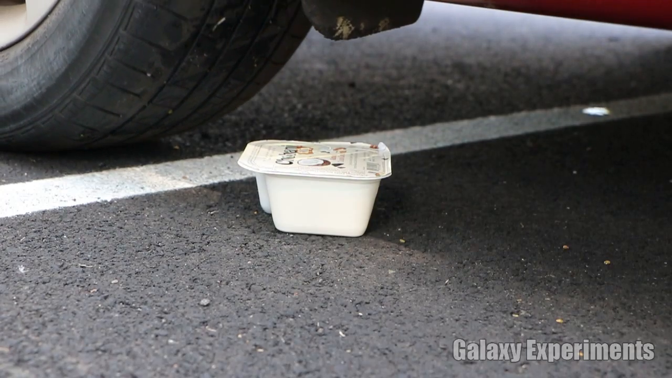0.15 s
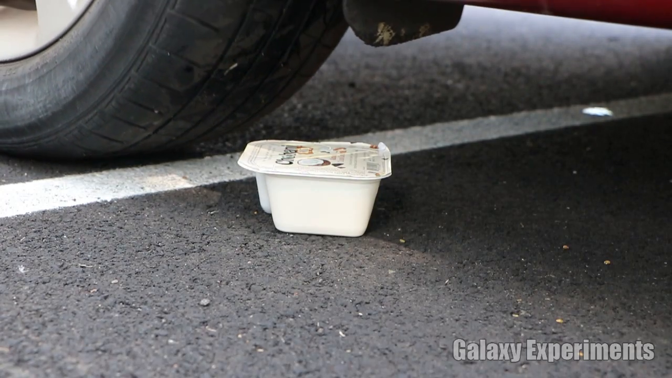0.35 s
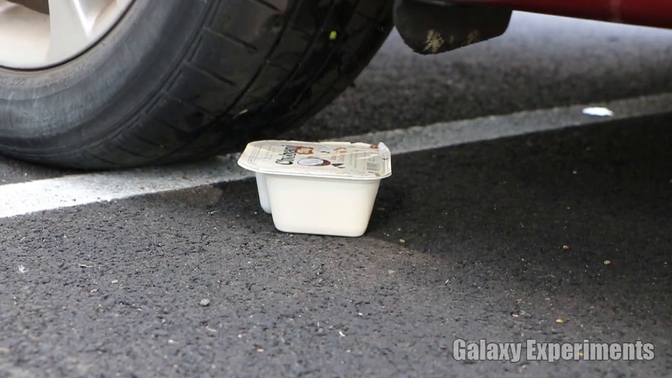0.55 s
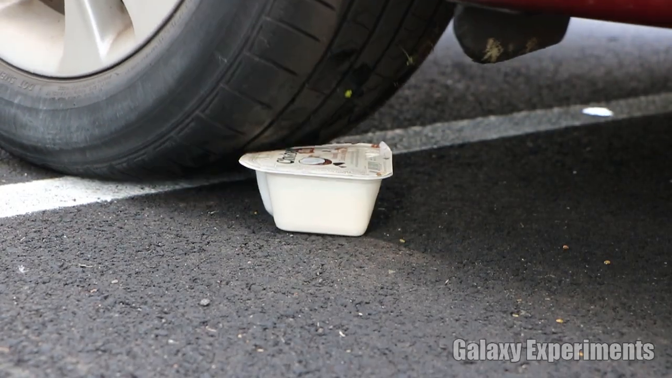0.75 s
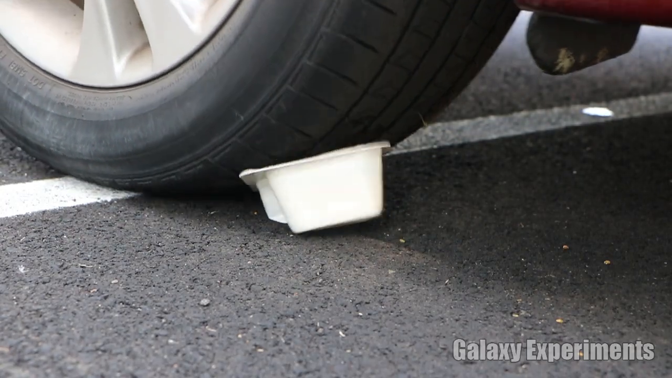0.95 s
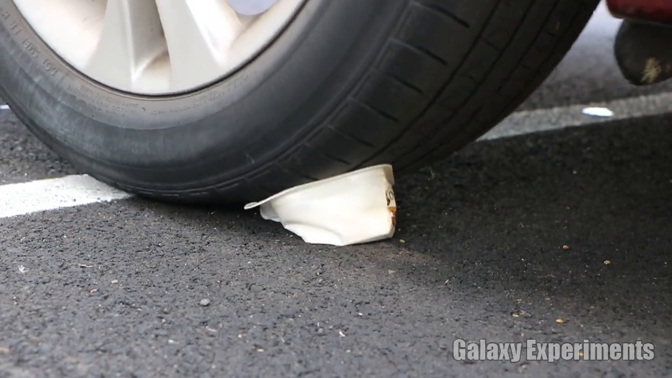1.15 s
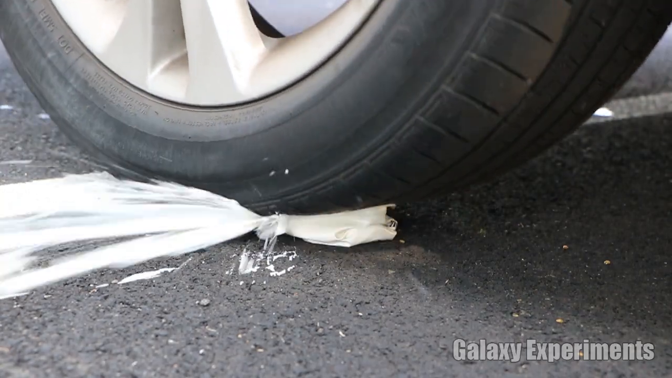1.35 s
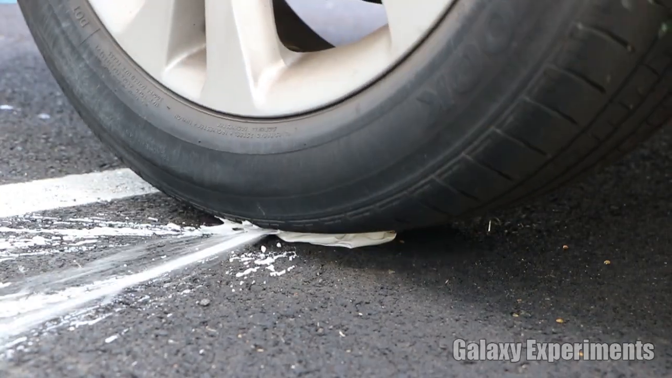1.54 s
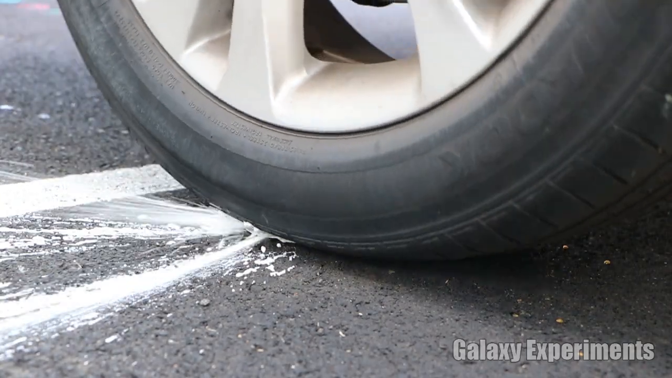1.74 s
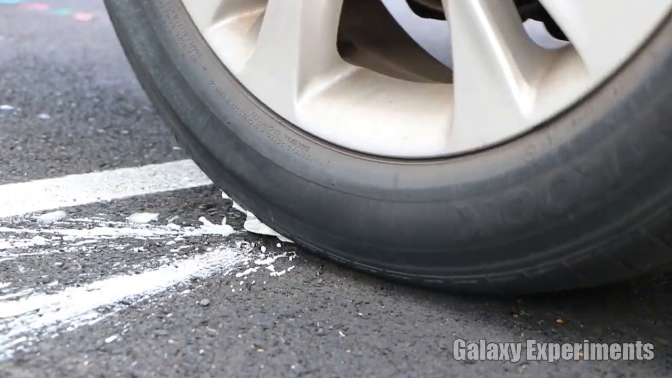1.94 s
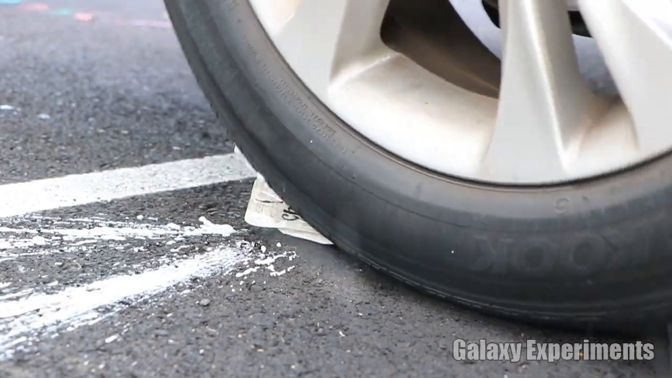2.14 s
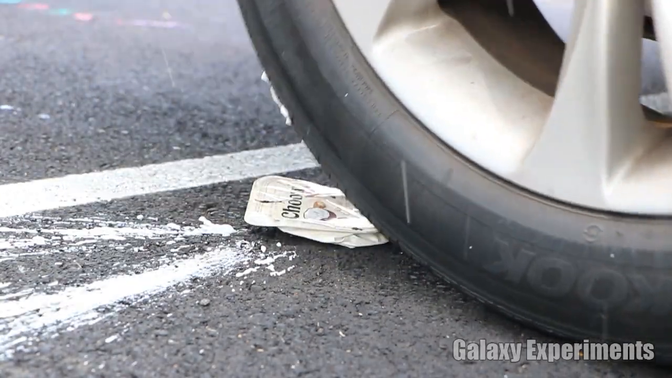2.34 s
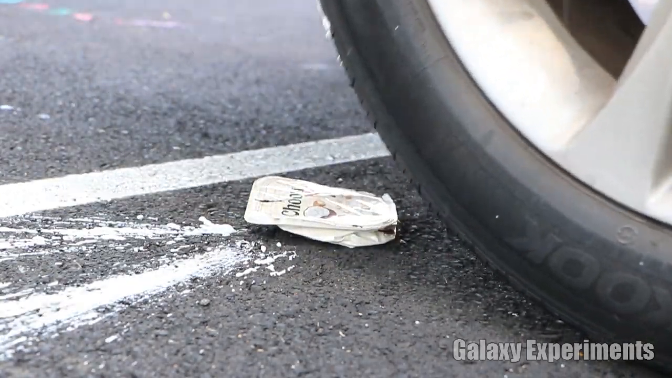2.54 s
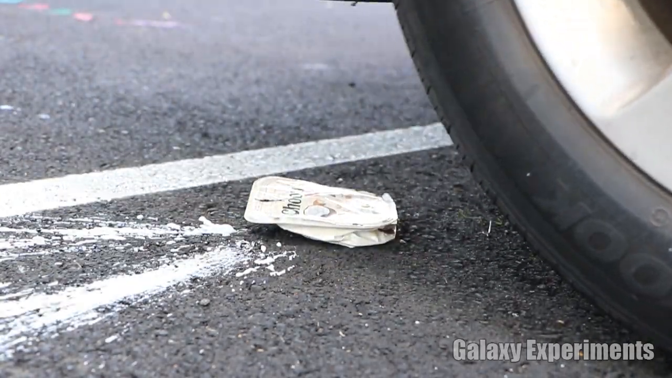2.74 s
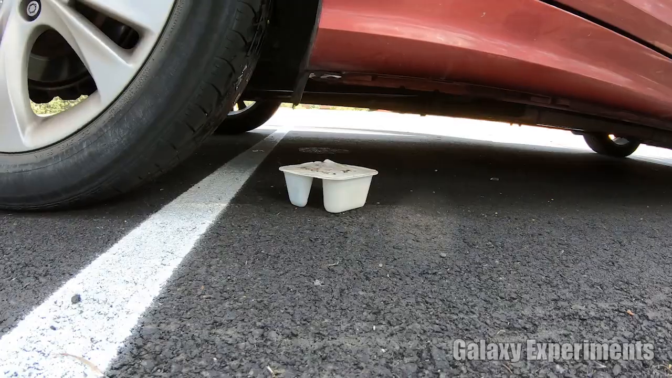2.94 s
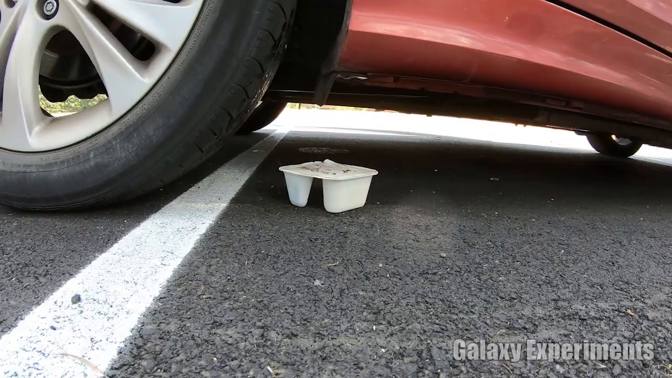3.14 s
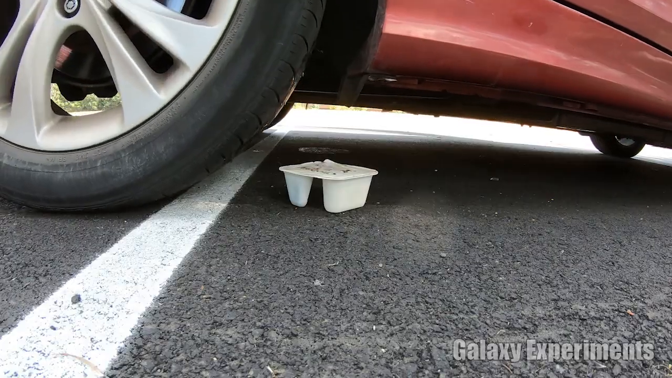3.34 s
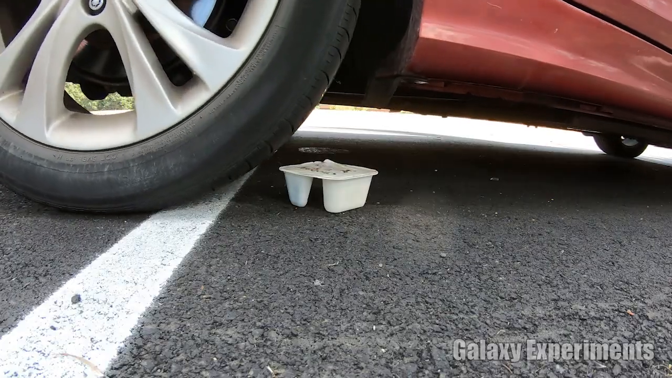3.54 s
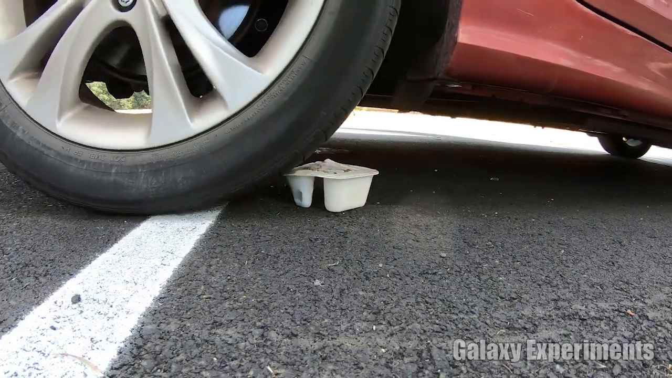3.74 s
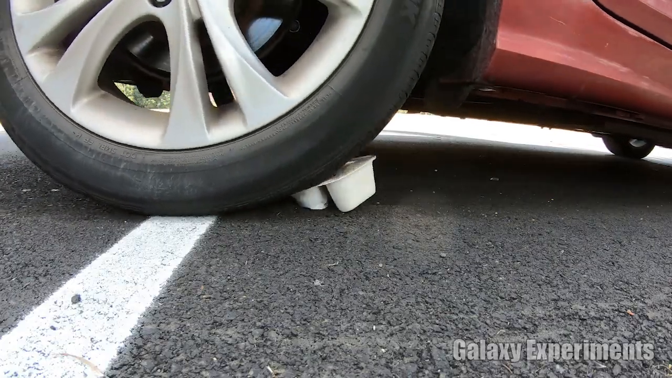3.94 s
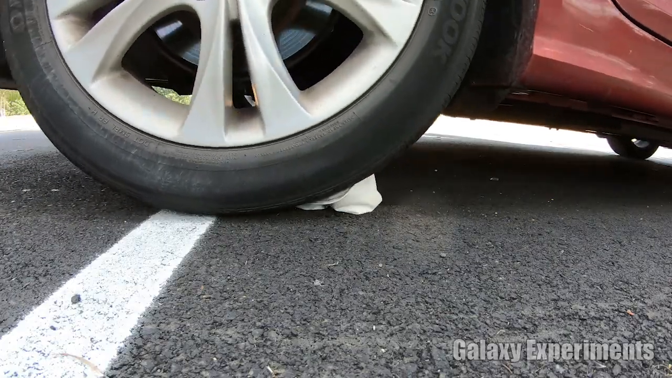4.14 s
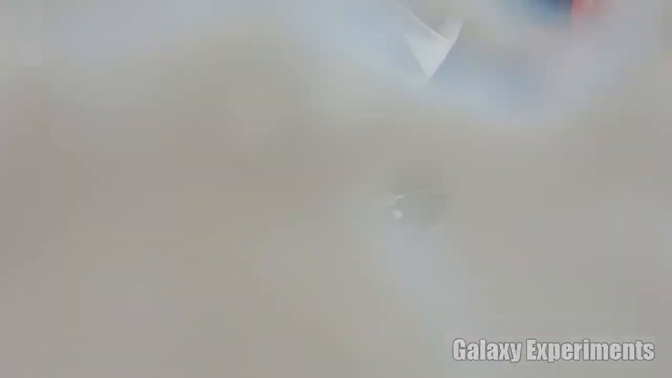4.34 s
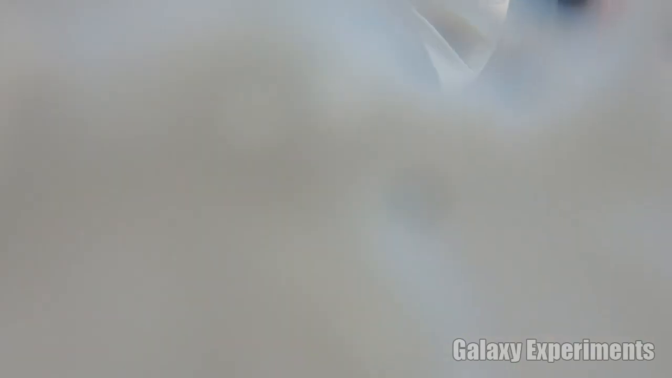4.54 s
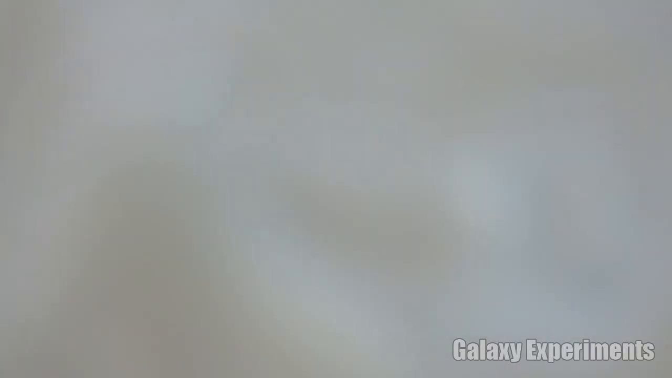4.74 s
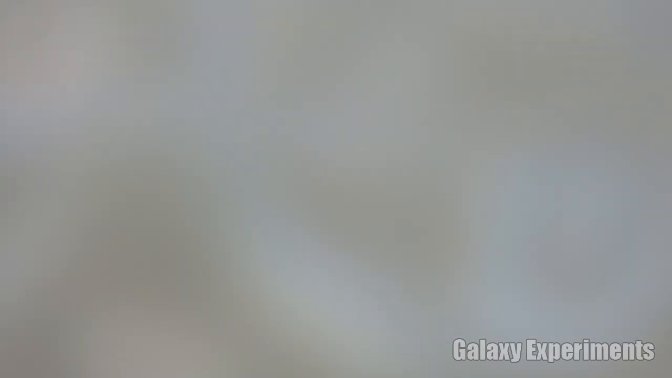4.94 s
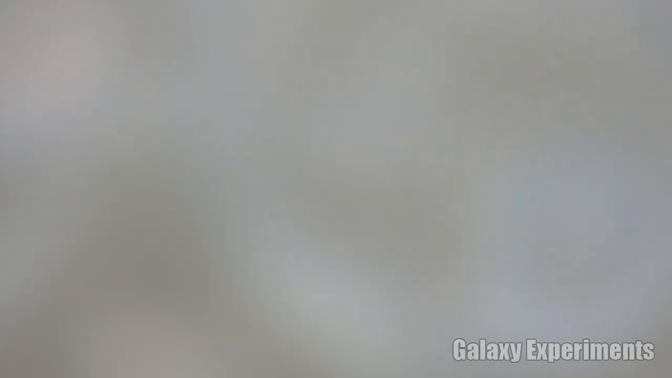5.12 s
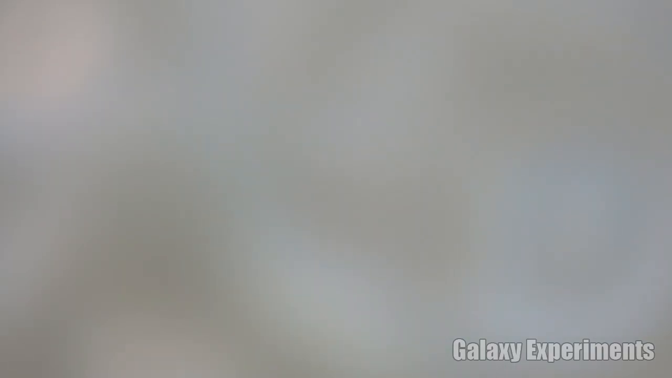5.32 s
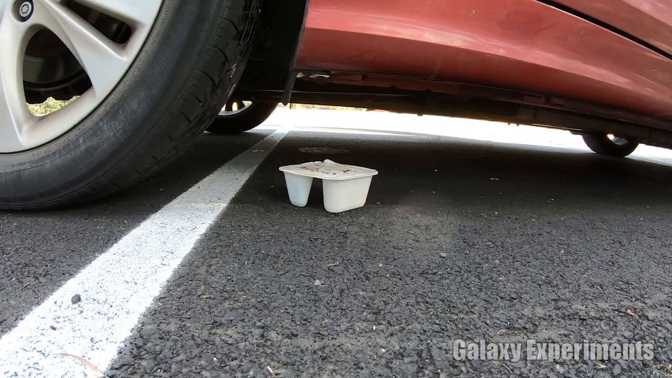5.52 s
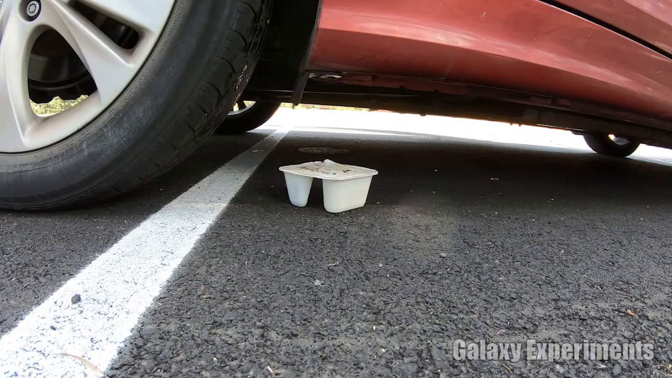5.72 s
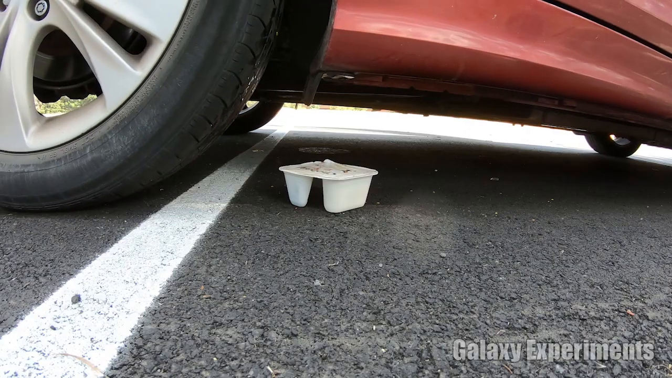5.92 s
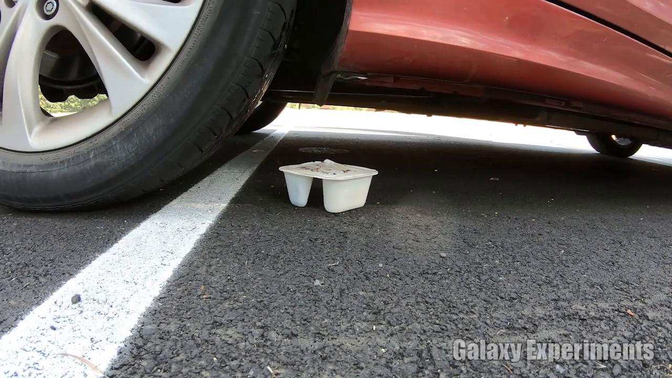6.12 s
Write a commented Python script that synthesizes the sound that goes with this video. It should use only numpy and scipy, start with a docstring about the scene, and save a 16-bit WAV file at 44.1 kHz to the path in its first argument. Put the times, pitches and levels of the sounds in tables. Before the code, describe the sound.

A plastic tub is crushed twice under a slow car tyre on asphalt. The first crush, close and in mono, builds from crackling to overloading cracks and a sizzling squirt, followed by a short rasp and small hollow pops. After a lull with a faint idling car, the second is heard low down in stereo: duller crackle, deep thuds and a loud burst that splashes the microphone, fading to a quiet low rumble.

```python
"""Tyre crushing a plastic tub.

A car rolls over a sealed tub on asphalt: the walls crackle, groan and crack, the filling squirts out.
The crush plays twice: in mono, then at a low stereo microphone that is splashed. Car park air ends it.
The volume is turned up for each crush, and the loudest cracks overload."""
import sys
import numpy as np
from scipy import signal
from scipy.fft import rfft, irfft
from scipy.io import wavfile
from scipy.ndimage import uniform_filter1d

SR = 44100
rng = np.random.default_rng(int(sys.argv[2]) if len(sys.argv) > 2 else 0)


def master(y):
    """Save y as 16-bit WAV."""
    cut = np.clip(np.atleast_2d(y).T, -1, 1)
    pcm = np.round(cut * 32767)  # scale
    wavfile.write(sys.argv[1], SR, pcm.astype(np.int16))


N = 276830
TIME_S = np.arange(N) / SR
MONO, LOW, TAIL = range(3)  # sections: mono crush, crush at the low microphone, air alone
BOUNDS_S, CRUSH_DELAY_S = (0, 2.908, 5.58, 6.3), (0, 3.0387, 5.8)


# First touch to roll-off: (crush time [s], crackle [dB], groan [dB], fizz [dB], crackle centre [Hz])
CRUSH = [(.792, -37, -42.5, -47, 1760), (.87, -24.5, -33.5, -47, 1900), (1.0, -27.5, -31.5, -43.5, 2100),
         (1.1, -35, -21, -45.5, 1450), (1.2, -35, -33.5, -41, 1540), (1.31, -43, -38, -37, 1650),
         (1.345, -49.5, -42.5, -65, 1500), (1.44, -38, -39.5, -35, 2000), (1.54, -43, -57.5, -46.5, 2300),
         (1.63, -35.5, -48, -33, 2650), (1.79, -43.5, -54.5, -34.5, 2800), (1.88, -32, -44, -25.5, 2680),
         (1.96, -42.5, -41, -40.5, 1900), (2.07, -38.5, -43, -48, 1690), (2.12, -32, -33.5, -39, 2800),
         (2.27, -34, -43, -40, 3000), (2.33, -51, -48, -61, 1600), (2.905, -48, -45.5, -64, 1500)]
# Tyre shielding the low microphone: (crush time [s], crackle gain [dB], groan gain [dB], fizz gain [dB])
SHADOW = [(.79, -16, -10.5, -9.5), (1.15, -10, -16, -11), (1.3, -23.5, -22.5, -18), (1.7, -18, -9, -9.5),
          (2.0, -13.5, -21, -8), (2.3, -10, -10, -13), (2.55, -12, -15, 5)]


def crushing():
    """Small folds crackle, large panels groan, the torn lid and the squirt fizz."""
    t = crush_time()
    gains = [amp(curve(CRUSH, k, t) + section(LOW) * curve(SHADOW, k, t)) for k in (1, 2, 3)]
    crackle = grains(800, 5200, cycles=2.8, per_s=3500, spread_db=3.8, centre_hz=curve(CRUSH, 4, t))
    groan = grains(330, 1000, cycles=2.6, per_s=600, spread_db=1.7)
    fizz = grains(3300, 14500, cycles=2.4, per_s=5000, spread_db=3.5)
    return (crackle * gains[0] + groan * gains[1] + fizz * gains[2]) * (t >= CRUSH[0][0])


def crack(ring_db, hz, boom_db, splinter_db, length_ms, noise):
    """A click and a burst of slips: the panel rings, the tub booms, splinters hiss. Also used for spatters."""
    t = np.arange(2500) / SR
    decay_ms = np.clip(.6 * length_ms, .1, 3)
    burst = (1 - np.exp(-t / .00058)) * np.exp(-(t * 1000 / decay_ms) ** .78)
    size = np.linalg.norm(burst)  # scales click and after-rattle
    click = size * signal.unit_impulse(len(t), round(.0005 * SR))
    slips = click + noise[0] * (burst + .018 * size * decay(t, .073))
    ring = band(slips, hz * .84, hz * 1.19) + .55 * band(band(slips, hz * .5, hz * 2.1), hz * .3, hz * 5.4)
    shove = 1.5 * click + noise[1] * (burst + .025 * size * decay(t, .07))
    boom = band(band(shove, 400, 800), 160, 1500)
    splinters = band(.57 * click + noise[2] * (burst ** 1.6 + .008 * size * decay(t, .03)), 6500, 22000)
    parts = (ring_db, ring), (boom_db, boom), (splinter_db, splinters)
    return sum(amp(db) * x / abs(x).max() for db, x in parts)


def snaps(count=70):
    """Random small cracks, as rows of CRACKS_AND_SPATTERS; level and pitch follow the crackle."""
    when, size, pitch, length = rng.random((count, 4)).T
    s = CRUSH[0][0] + when * (CRUSH[-2][0] - CRUSH[0][0])
    db = curve(CRUSH, 1, s) + 5.5 - 4 * np.log(size + .01)
    hz = curve(CRUSH, 4, s) * 2 ** (1.6 * pitch - .4)
    return np.transpose([s, db, hz, db - 8.5, db - 13, 2.4 * (length + .2), curve(SHADOW, 1, s)])


# Wall cracks, plus a few spatters of filling striking the low microphone: (crush time [s], ring [dB],
# ring pitch [Hz], boom [dB], splinters [dB], nominal length [ms], gain at the low microphone [dB])
CRACKS_AND_SPATTERS = [(.8343, 4, 1335, -19.5, -11.5, 6.4, -12.5), (.8484, -7.5, 1530, -13.5, -33, 4.3, -8),
                       (.8674, -10.5, 1470, -14.5, -36.5, 3.7, -9), (.914, -20, 3200, -18, -34, 2.6, -18),
                       (.9237, -7.5, 2470, -15.5, -37, 1.2, -25), (.9513, -8, 3900, -13, -34, 1.3, -16),
                       (.9717, -20, 4200, -33.5, -34.5, 2.1, -22),
                       (.9867, -12.5, 2580, -24, -30.5, 1.1, -9), (.9934, -8, 2460, -32, -33.5, .87, -31),
                       (1.0229, 1.5, 2500, -5, -20, 1, -10), (1.0912, -14, 900, -13.5, -37, 3.7, -22),
                       (1.1374, -4.5, 1790, -27, -16, .47, -16), (1.1439, -6, 1200, -7.5, -20, .96, -6.5),
                       (1.2106, -1.5, 1620, -5.5, -19, .96, -15.5),
                       (1.2145, -19, 905, -23.5, -34.5, 2.4, 0.5), (1.2637, -33.5, 770, -24, -53.5, 3.8, 8),
                       (1.2741, -29, 724, -16.5, -49.5, 1.7, 11.5), (1.2859, 7.5, 726, 6, 4.5, 1.26, -8),
                       (1.3395, -44.5, 1740, -61.5, -44, 4.6, 18.5), (1.3575, -10, 3230, -25, -11, 5, -19),
                       (1.3644, -60, 4450, -61, -26.5, 1.9, 16), (1.3894, -11.5, 1100, -32, -3, 5.3, -15),
                       (1.3994, -6.5, 4430, -23.5, -17, .34, -19.5),
                       (1.4416, -11, 1840, -38.5, -3, 2.7, -20.5),
                       (1.4545, -20.5, 3850, -23.5, -21, .3, -15), (1.4577, -35.5, 910, -42, -35, .7, 13.5),
                       (1.4674, 6, 3100, -5, 2, .9, -7), (1.4688, 6, 1100, 0, -13, 3, -28),
                       (1.5703, -14.5, 2550, -48, -33, .6, -22.5),
                       (1.6026, -15.5, 2580, -29, -28.5, .71, -28), (1.6213, -19, 3100, -43, -17, .41, -19),
                       (1.6404, -6, 2980, -37.5, -3, 1.4, -22), (1.6672, 8.5, 3600, -24, -5, 3, -15),
                       (1.7074, -5, 3600, -40, -15, 2, -5), (1.7126, -2.5, 2750, -39, -6, 1.3, -13),
                       (1.7415, -4, 4670, -36.5, 0, 1.8, -9), (1.7572, 2.5, 3870, -19, -2.5, 1.05, -11),
                       (1.774, -15.5, 3570, -36, -13, 1.7, -4), (1.7992, -4, 3280, -30, 5.5, 2.1, -8),
                       (1.8069, -1, 4570, -47, -10, .98, -20), (1.8256, -14, 3300, -34.5, -1.5, 1.2, -10),
                       (1.8303, -21, 2000, -41, -13.5, 3, 6), (1.8445, -5, 4100, -38, 0, 2, -8.5),
                       (1.8614, -11, 5340, -34, -3, 2, -21), (1.8767, -20, 2930, -30, -3, .35, -13),
                       (1.886, -25, 3670, -47, -4, 1.3, -4), (2.0855, -28, 1500, -21.5, -42, 2.5, -12),
                       (2.206, -15, 1320, -42, -53, 1, -22), (2.2877, -15.5, 1370, -30, -35, 1.7, -16)]


def cracks_and_spatters():
    """The walls crack and filling strikes the low microphone, which gets less boom and more treble."""
    out, rows = np.zeros(N), np.concatenate([CRACKS_AND_SPATTERS, snaps()])
    for s, ring_db, hz, boom_db, splinter_db, ms, low_db in rows:
        noise = rng.standard_normal((3, 2500))
        onset_s = s - .0004  # the burst swells before it peaks
        add(out, onset_s, crack(ring_db, hz, boom_db, splinter_db, ms, noise))
        low_hit = crack(ring_db, hz, boom_db - 1.5, splinter_db + 2.5, ms, noise[::-1])
        add(out, onset_s + CRUSH_DELAY_S[LOW], amp(low_db) * low_hit)
    return out


# Pressure pulses: (time [s], level [dB], rise [ms])
SPLATS = [(1.287, -20, 1.2), (1.469, -16.5, 0.68), (1.756, -32.5, 1.2), (4.327, -2.5, 0.5), (4.4, -18, 1.2),
          (4.507, -7, 2.36)]


def splats():
    """The sealed tub bursts and pushes air; the microphone leaks the pulse away and overshoots."""
    out, t = np.zeros((2, N)), np.arange(4000) / SR
    for s, db, rise_ms in SPLATS:
        age = t * 1000 / rise_ms
        push = band(-amp(db) * age * np.exp(1 - age), 37, 1980)
        add(out[0], s, (.7 if s > BOUNDS_S[LOW] else 1) * push)
        add(out[1], s, push)
    return out


# Thudding, one curve per crush: (time [s], level [dB])
THUDDING = [
    [(.792, -47), (1.11, -48), (1.18, -37), (1.3, -30.5), (1.37, -58), (1.43, -41), (1.55, -81), (2.1, -68),
     (2.32, -46), (2.34, -71), (2.905, -71)],
    [(3.846, -52), (3.91, -42.5), (4.1, -38), (4.23, -38), (4.41, -28), (4.54, -49), (4.72, -50),
     (5.04, -53.5), (5.57, -58)],
]


def thudding():
    """Lumpy push of air and filling; deeper and partly unrelated at the low microphone's two ports."""
    mono = unit_rms(band(band(rng.standard_normal(N), 85, 230), 89, 390))
    common, left, right = (noise_band(54, 210) * amp(5.1 * wander(30.3)) for _ in range(3))
    stereo = .58 * common + np.array([.26 * left - .13 * right, .57 * right])
    return np.where(section(MONO), mono, stereo) * envelope(THUDDING, 1)


# Dents: (time [s], level [dB], pitch [Hz], t60 [s])
PLOPS = [(2.424, -10, 612, 0.055), (2.468, -24, 638, 0.036), (2.584, -5.5, 516, 0.016)]


def plops():
    """Dents spring back with hollow knocks: a low ring and a faster-dying overtone."""
    out, t = np.zeros(N), np.arange(4000) / SR
    for s, db, hz, t60_s in PLOPS:
        ring = np.sin(2 * np.pi * hz * t) * decay(t, t60_s)
        overtone = .5 * np.sin(2 * np.pi * 1.71 * hz * t) * decay(t, .4 * t60_s)
        add(out, s, amp(db) * (ring + overtone) * (1 - np.exp(-t / .00051)))
    return out


def rasp():
    """Dense slips in one narrow fold as the tread lets go of the flat tub."""
    slips = grains(1050, 1750, cycles=4, per_s=1500, spread_db=2.5, pitches=6)
    return slips * swell(start_s=2.09, rise_s=.03, end_s=2.25, fall_s=.05, db=-29, low_gain_db=-9)


def sizzle():
    """Filling sizzles out of the tread as tiny bubbles burst."""
    bubbles = grains(7000, 14500, cycles=3, per_s=14000, spread_db=1.8, pitches=9)
    return bubbles * swell(start_s=1.6, rise_s=.25, end_s=1.91, fall_s=.06, db=-36, low_gain_db=-4)


# Hum, one curve per stretch: (time [s], pitch [Hz], level [dB])
HUM = [
    [(.95, 223.3, -38), (1.15, 224.3, -36), (1.45, 221, -40), (1.66, 222.7, -45.5), (1.72, 215, -72)],
    [(4.17, 250, -40), (4.22, 258, -30.5), (4.28, 248, -40)],
    [(4.55, 227, -43.5), (4.7, 217, -51)],
]


def hum():
    """A low, slightly wavering tone under load."""
    hz = curve(np.concatenate(HUM), 1, TIME_S) * (1 + .01 * wander(27))
    return np.sqrt(2) * np.sin(2 * np.pi * np.cumsum(hz) / SR) * envelope(HUM, 2)


# Tread hiss: (time [s], level [dB])
ROLLING = [(2.33, -60), (2.43, -49.5), (2.55, -56), (2.905, -53.5)]


def rolling():
    """The wet tread hisses as it rolls away after the first crush."""
    return noise_band(2400, 4700) * envelope([ROLLING], 1)


# Low microphone port response: (frequency [Hz], left [dB], right [dB])
PORTS = [(59.6, -3, -14.5), (700, -4, 2), (2310, 1.5, 2), (8000, -2, 1), (9700, -3.5, 2.5),
         (12200, -12.5, -13.5), (16000, -19.5, -19.5)]


def under_car(x):
    """Short scatter off road, wheel and sill; opposite in phase at the low microphone's two ports."""
    t = np.arange(1500) / SR
    taps = rng.standard_normal(1500) * (rng.random(1500) < .3) * decay(t, .018) * (t > .0002)
    echo = signal.oaconvolve(x, taps / np.linalg.norm(taps))[:N]
    side = amp(-9.5) * (echo + 1.6 * band(echo, 5860, 14880))  # treble scatters most
    hz = np.fft.rfftfreq(N, 1 / SR)
    ports = amp([spectrum(PORTS, k, hz) for k in (1, 2)])
    stereo = irfft(rfft([x + side, x - side]) * ports, N)
    return np.where(section(MONO), x + amp(-17.5) * echo, stereo)


# Air spectrum, one per section: (frequency [Hz], relative density [dB])
AIR = [
    [(18, -80.5), (30, -52.5), (90, -26), (106, -19.5), (170, 3), (540, -1.5), (584, -3.5), (822, -7),
     (1320, -9.5), (1460, -7), (2290, -20), (2540, -17), (3220, -23.5), (11400, -35), (16000, -50)],
    [(15, -41), (25, -2.5), (76, -0.5), (175, -2), (301, -13.5), (607, -28.5), (714, -30.5), (1610, -23.5),
     (2220, -39), (2550, -36.5), (4870, -40), (7310, -63.5), (16000, -63.5)],
    [(15, -26.5), (25, -5.5), (87, -6.5), (127, -22), (145, -20.5), (476, -41.5), (714, -31), (863, -32),
     (1130, -50.5), (1230, -41), (2160, -48), (2610, -56), (16000, -68)],
]
# Stereo air: (frequency [Hz], left-right coherence [0..1])
AIR_COHERENCE = [(30, 0.67), (400, 1), (900, 0.18), (9000, 0.05)]


def air():
    """Car park air with the idling car: noise with drifting patches, mono, then wide in the treble."""
    hz, out = np.fft.rfftfreq(1024, 1 / SR), np.zeros((2, N))
    for k, rms_db in (MONO, -43), (LOW, -42), (TAIL, -36.5):
        draws = rng.standard_normal((N // 256 + 5, 513, 5)).T
        left, unrelated = draws[0] + 1j * draws[1], draws[2] + 1j * draws[3]
        patches_db = 2 * unit_rms(uniform_filter1d(uniform_filter1d(draws[4], 3, 0), 20, 1))
        coherence = 1 if k == MONO else spectrum(AIR_COHERENCE, 1, hz)[:, None]
        right = coherence * left + np.sqrt(1 - coherence ** 2) * unrelated
        bins = np.array([left, right]) * amp(spectrum(AIR[k], 1, hz)[:, None] + patches_db)
        noise = signal.istft(bins, nperseg=1024, noverlap=768)[1][:, :N]
        out += amp(rms_db) * unit_rms(noise) * section(k)
    return out


# Idle noise bands: (centre [Hz], width [Hz], level [dB])
WHINES = [(594, 30, -52), (1440, 63, -56.5), (1810, 140, -59.5), (2590, 80, -65)]


def whines():
    """Fuzzy whines of the idling car, near the mono microphone only."""
    return section(MONO) * sum(amp(db) * noise_band(hz - w / 2, hz + w / 2) for hz, w, db in WHINES)


# Chirps: (time [s], pitch [Hz], level [dB])
CHIRPS = [(.318, 3010, -49), (3.36, 3000, -54)]


def bird():
    """A far bird: one faint chirp with its echo, heard once in each pass of the crush."""
    out, t = np.zeros(N), np.arange(3000) / SR
    shape = np.exp(-((t - .006) / .0035) ** 2) + .54 * np.exp(-t / .044)
    for s, hz, db in CHIRPS:
        add(out, s, amp(db) * np.sin(2 * np.pi * hz * t) * shape)
    return out


def grains(low_hz, high_hz, cycles, per_s, spread_db, centre_hz=None, pitches=20):
    """Tiny rings of many pitches at random moments; a few are large and they come in clumps."""
    clumps_db = 3 * wander(200)
    size = amp(spread_db * np.minimum(rng.exponential(1, N), 3.5) + clumps_db)
    kicks = size * (rng.random(N) < per_s / SR) * rng.choice([-1., 1.], N)
    pitch_index, out = rng.integers(0, pitches, N), np.zeros(N)
    for k, hz in enumerate(np.geomspace(low_hz, high_hz, pitches)):
        turns = np.arange(1500) * hz / SR
        ring = np.sin(2 * np.pi * turns) * np.exp(-turns / cycles) * np.minimum(turns, 1)
        weight = 1
        if centre_hz is not None:  # folds of one size lead
            weight = np.exp(-(np.log(hz / centre_hz) / .5) ** 2) * (centre_hz / hz) ** .6
        out += signal.oaconvolve(kicks * weight * (pitch_index == k), ring / np.linalg.norm(ring))[:N]
    return unit_rms(out)


def swell(start_s, rise_s, end_s, fall_s, db, low_gain_db):
    """Gain that rises, holds and falls in crush time."""
    t = crush_time()
    ramps = np.minimum((t - start_s) / rise_s, 1 - (t - end_s) / fall_s)
    return np.clip(ramps, 0, 1) * amp(db + low_gain_db * section(LOW))


def envelope(curves, column):
    """Gain from dB curves, silent outside them."""
    t = TIME_S
    return sum(amp(curve(c, column, t)) * (t >= c[0][0] - .004) * (t < c[-1][0]) for c in curves)


def crush_time():
    """Clock of the crush in seconds, set back in each new section."""
    return TIME_S - sum(delay_s * section(k) for k, delay_s in enumerate(CRUSH_DELAY_S))


def section(k):
    return (TIME_S >= BOUNDS_S[k]) & (TIME_S < BOUNDS_S[k + 1])


def curve(rows, column, t):
    table = np.transpose(rows)
    return np.interp(t, table[0], table[column])


def spectrum(rows, column, hz):
    table = np.transpose(rows)
    return np.interp(np.log(hz + 1), np.log(table[0] + 1), table[column])


def band(x, low_hz, high_hz):
    edges_hz = [low_hz, min(high_hz, SR / 2 - 500)]
    return signal.sosfilt(signal.butter(2, edges_hz, "band", fs=SR, output="sos"), x)


def noise_band(low_hz, high_hz):
    return unit_rms(band(rng.standard_normal(N), low_hz, high_hz))


def wander(rate_hz):
    return noise_band(rate_hz / 10, rate_hz)


def amp(db):
    return 10 ** (np.asarray(db) / 20)


def decay(t, t60_s):
    return amp(-60 * t / t60_s)


def unit_rms(x):
    return x / np.sqrt(np.mean(x ** 2) + 1e-20)


def add(mix, start_s, sound):
    part = mix[round(start_s * SR):][:len(sound)]
    part += sound[:len(part)]


def scene():
    """The tub under the car, its low pushes of air, and the car park."""
    tub = crushing() + cracks_and_spatters() + plops() + rolling() + rasp() + sizzle()
    tub = band(tub, 130, SR / 2) + hum()  # low-cut keeps deep bass out of the crackle and cracks
    splashed = uniform_filter1d(1. * (TIME_S > 4.52) * section(LOW), size=300)
    air_gain = amp(-9.5 * splashed)  # the splashed microphone hears less air
    return under_car(tub) + thudding() + splats() + air_gain * air() + whines() + bird()


# Volume steps: (start [s], gain [dB])
FADER = [(0, -21), (0.787, -3), (2.323, -21), (3.841, -1.5), (5.045, -27)]


def record(dry):
    """Volume steps, overload at full scale, then a low-pass."""
    start_s, db = np.transpose(FADER)
    fader = amp(db[np.searchsorted(start_s[1:], TIME_S)])
    clipped = np.clip(dry * uniform_filter1d(fader, size=40), -1, 1)
    lowpass = signal.firwin(511, cutoff=16050, window=("kaiser", 9), fs=SR)
    return np.clip(signal.oaconvolve(clipped, lowpass[None], "same"), -1, 1)


dry = scene()
out = record(dry)
master(out)
```